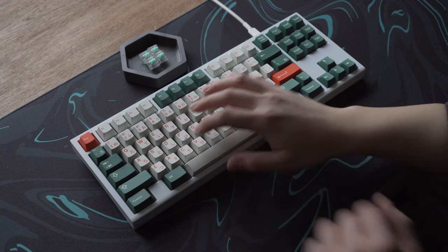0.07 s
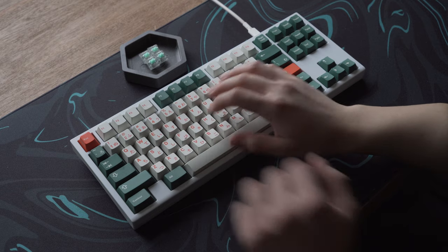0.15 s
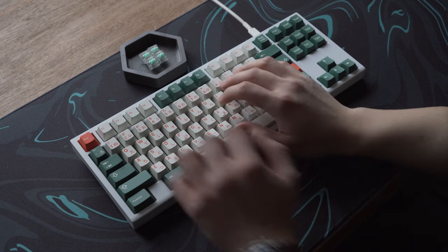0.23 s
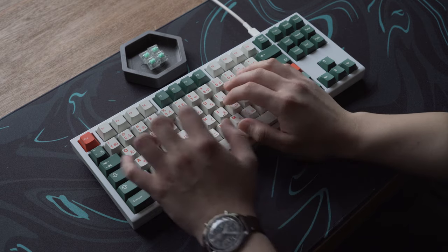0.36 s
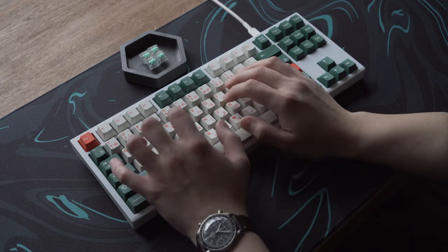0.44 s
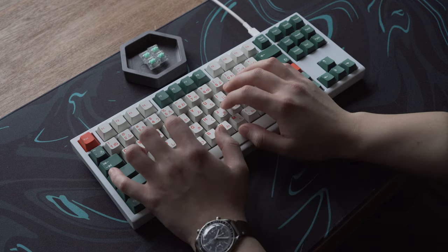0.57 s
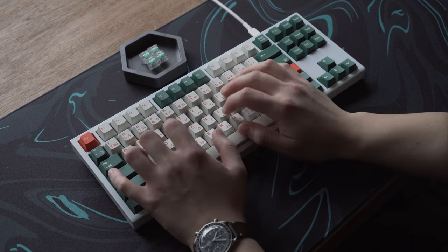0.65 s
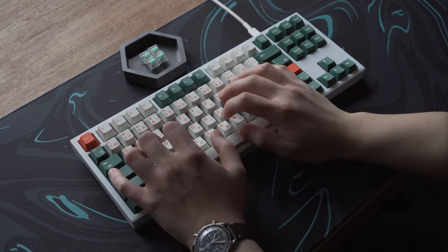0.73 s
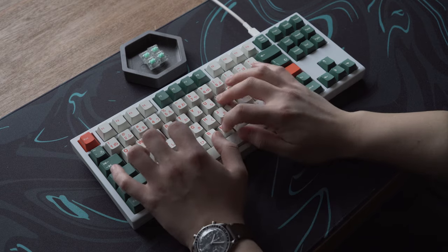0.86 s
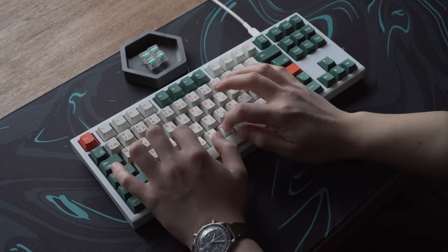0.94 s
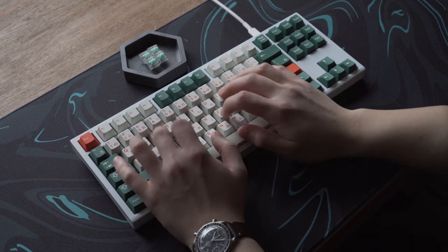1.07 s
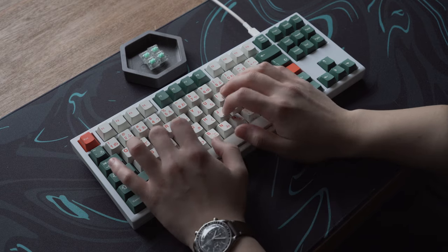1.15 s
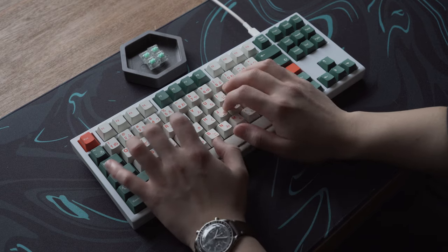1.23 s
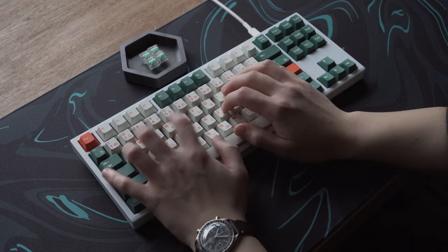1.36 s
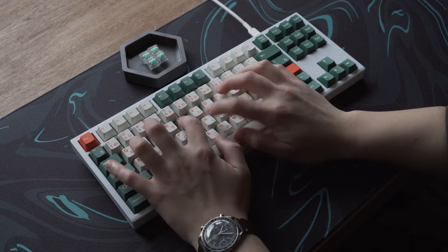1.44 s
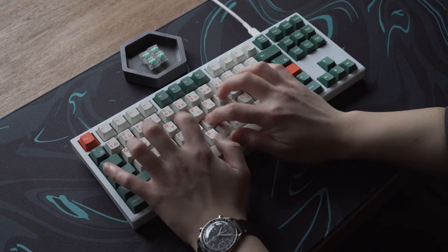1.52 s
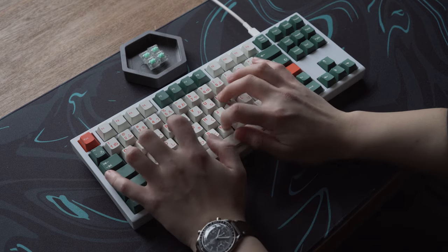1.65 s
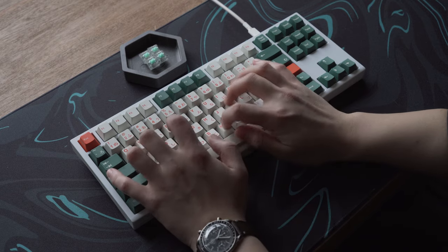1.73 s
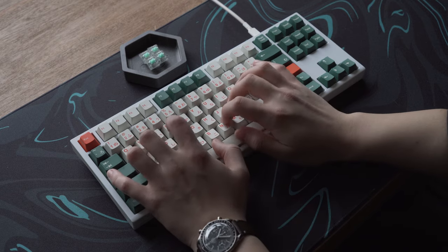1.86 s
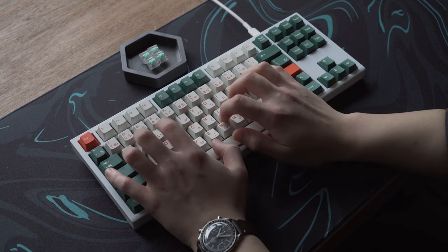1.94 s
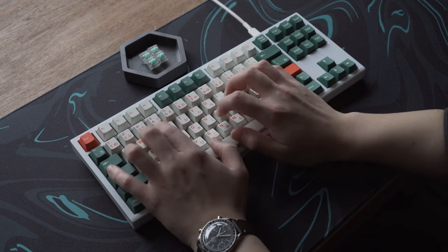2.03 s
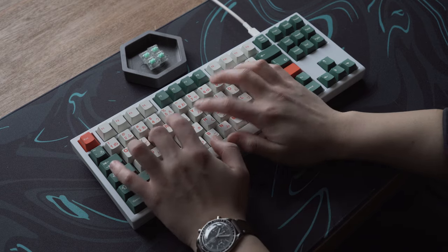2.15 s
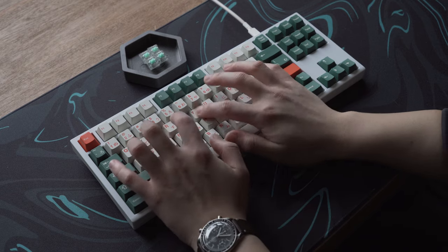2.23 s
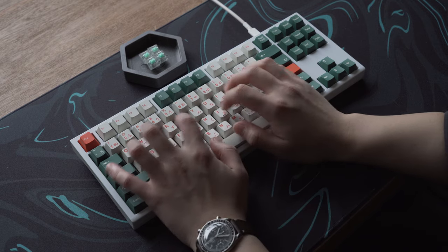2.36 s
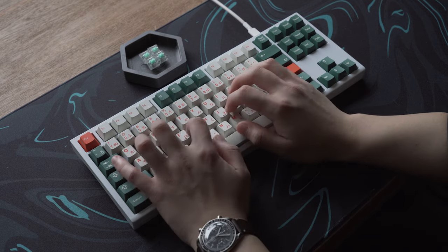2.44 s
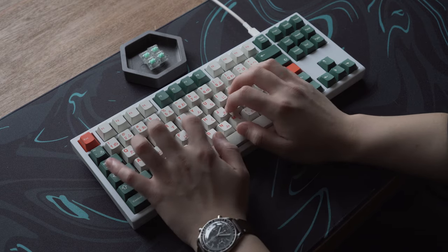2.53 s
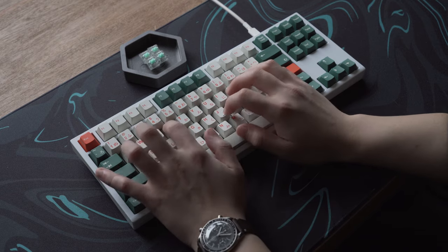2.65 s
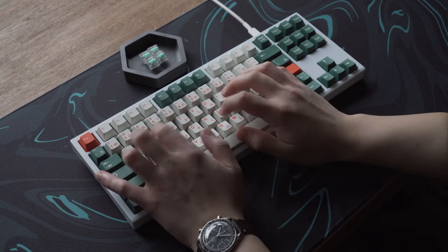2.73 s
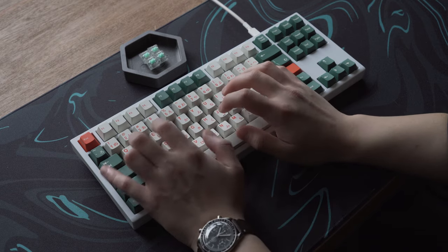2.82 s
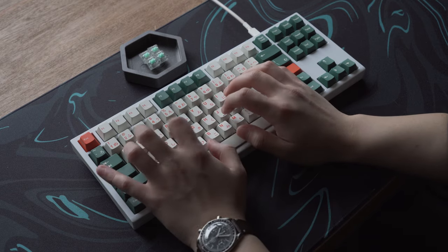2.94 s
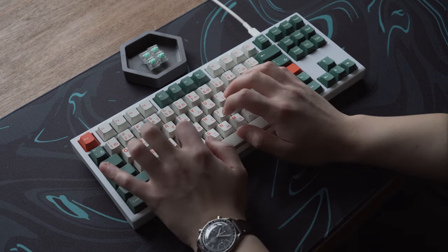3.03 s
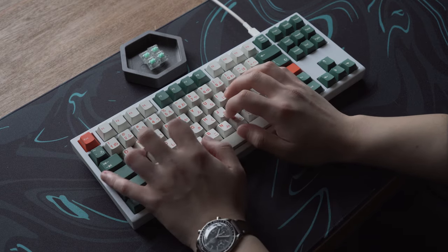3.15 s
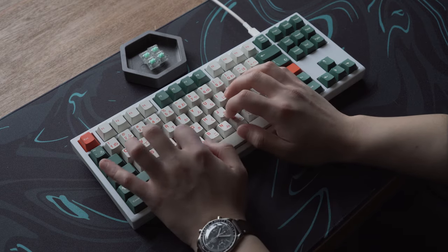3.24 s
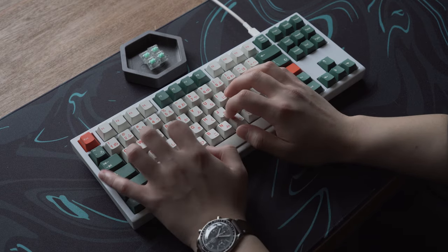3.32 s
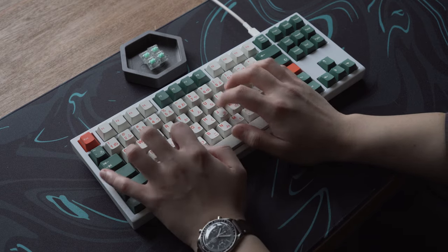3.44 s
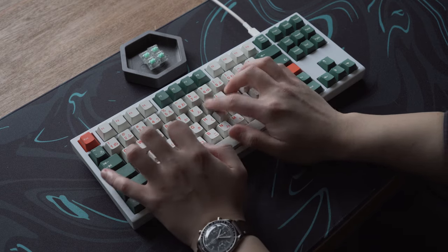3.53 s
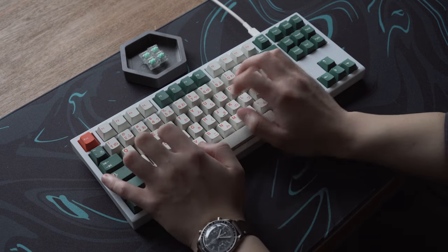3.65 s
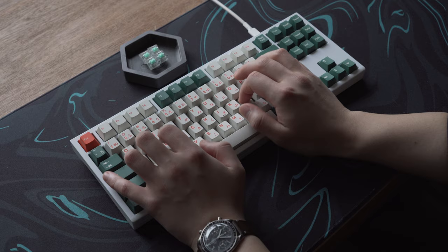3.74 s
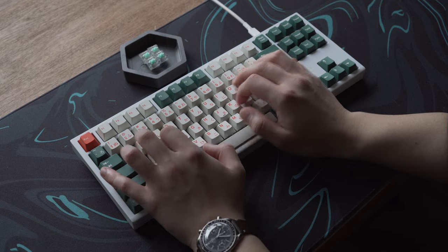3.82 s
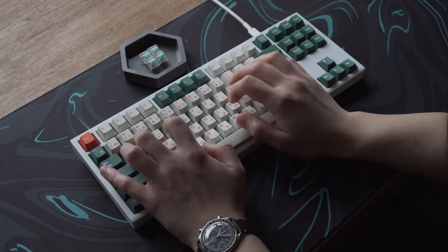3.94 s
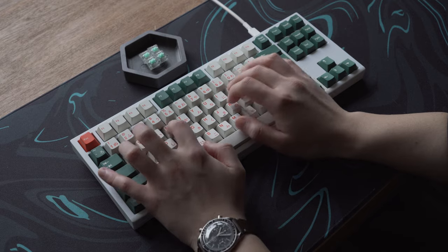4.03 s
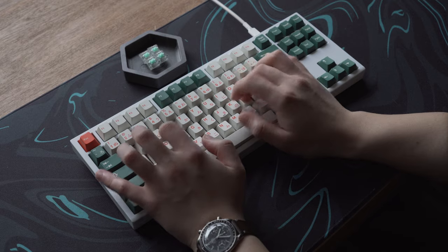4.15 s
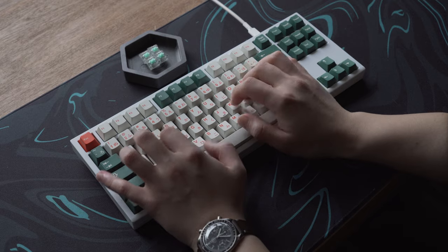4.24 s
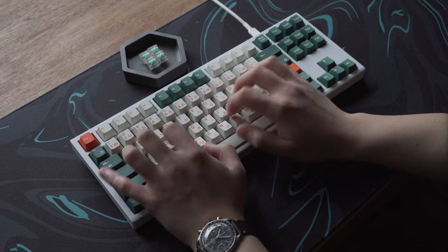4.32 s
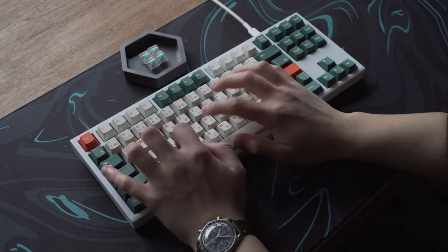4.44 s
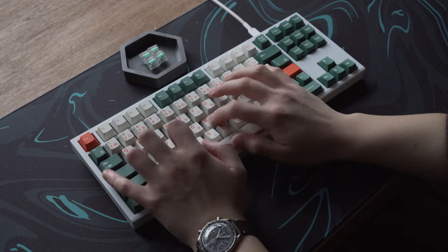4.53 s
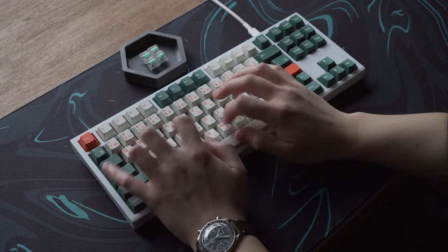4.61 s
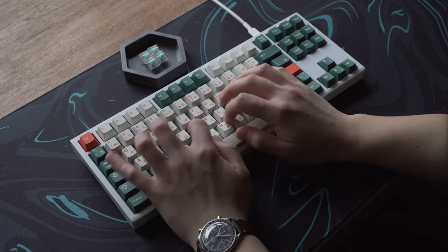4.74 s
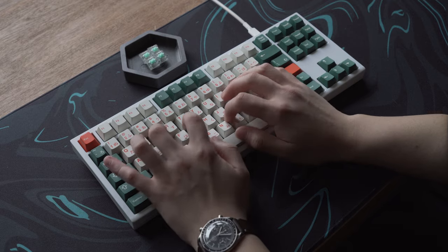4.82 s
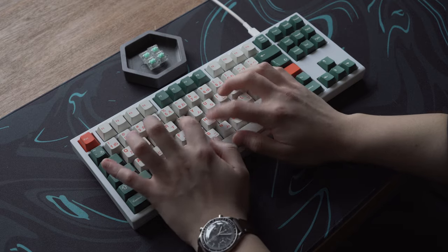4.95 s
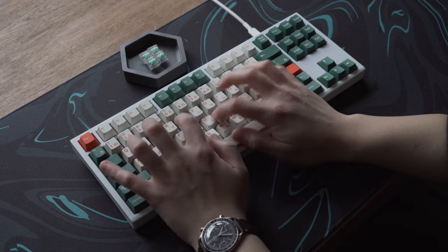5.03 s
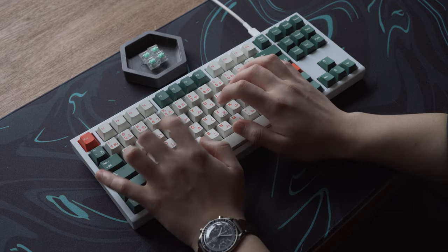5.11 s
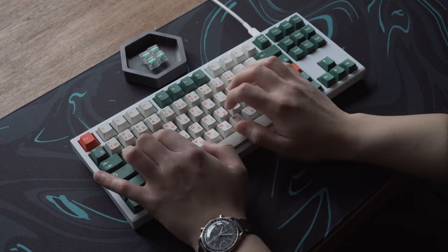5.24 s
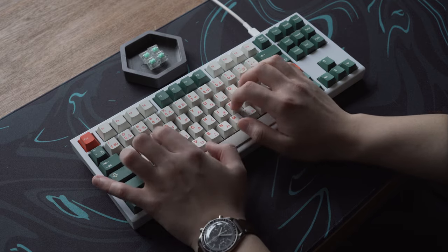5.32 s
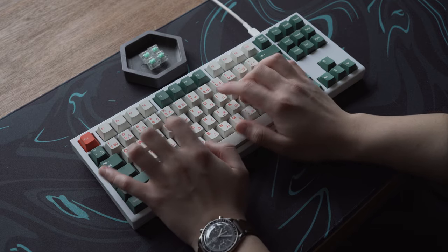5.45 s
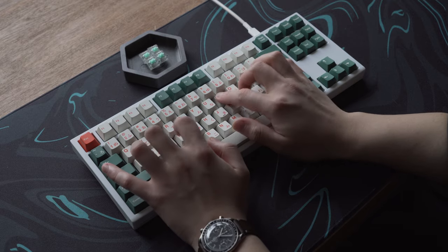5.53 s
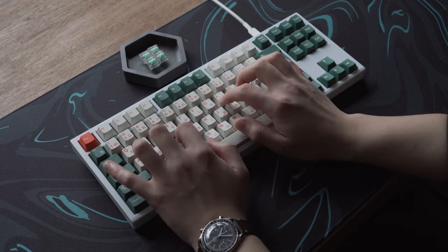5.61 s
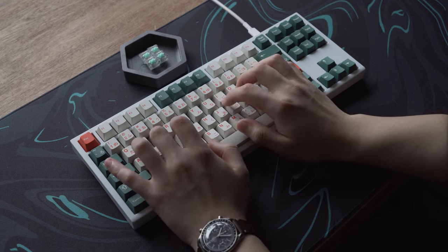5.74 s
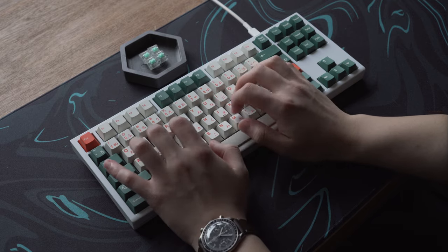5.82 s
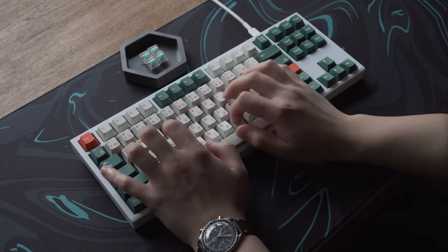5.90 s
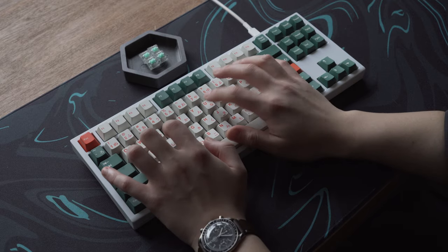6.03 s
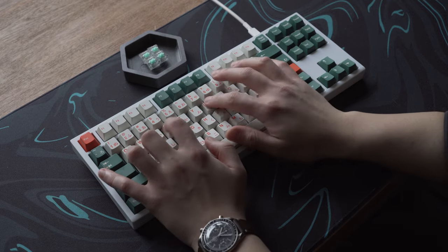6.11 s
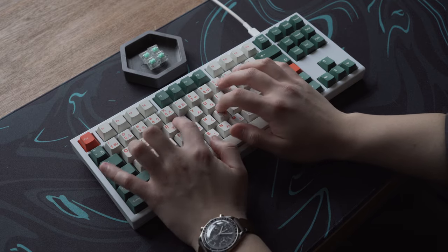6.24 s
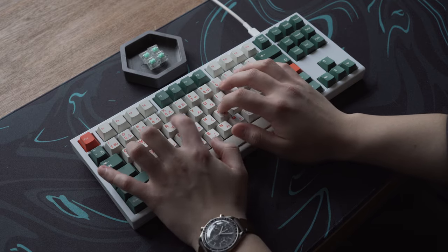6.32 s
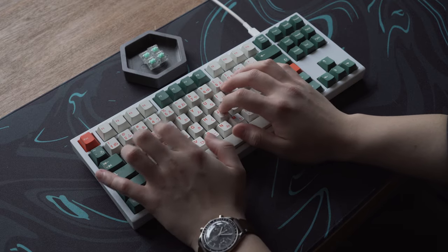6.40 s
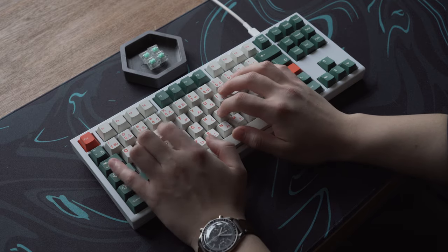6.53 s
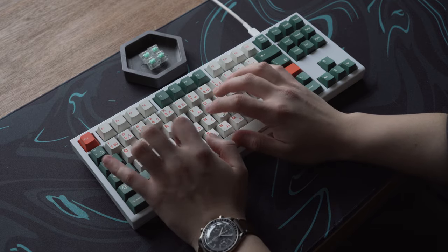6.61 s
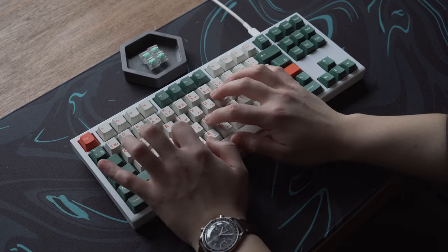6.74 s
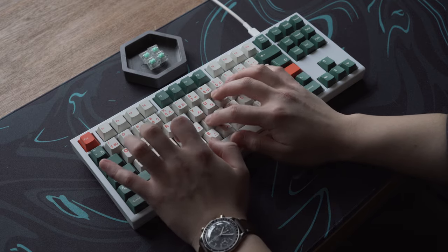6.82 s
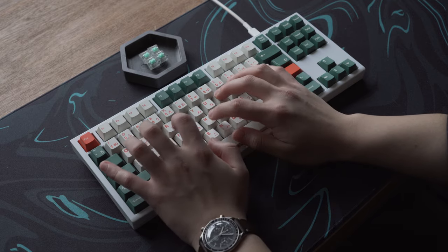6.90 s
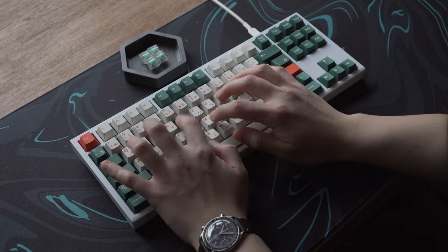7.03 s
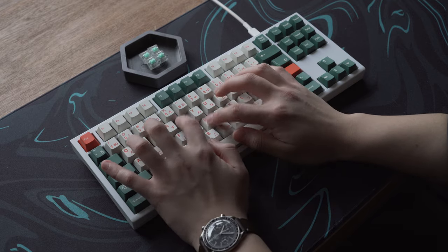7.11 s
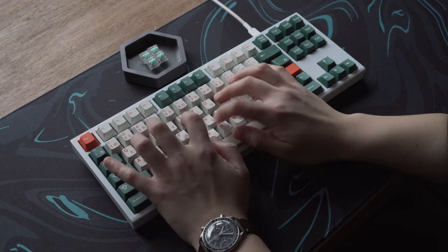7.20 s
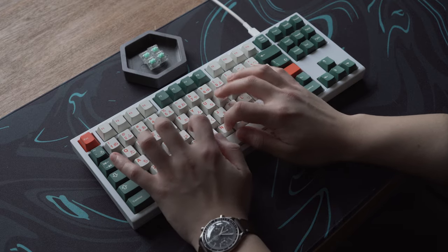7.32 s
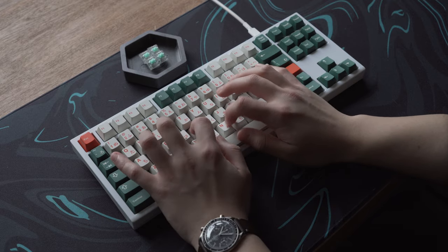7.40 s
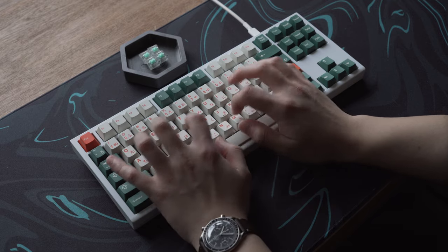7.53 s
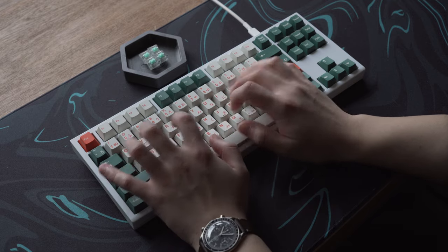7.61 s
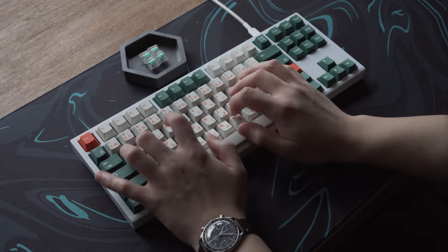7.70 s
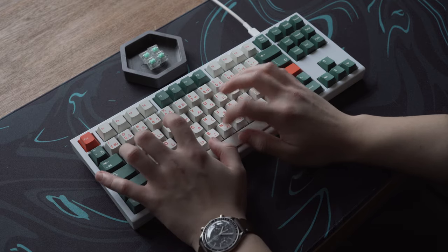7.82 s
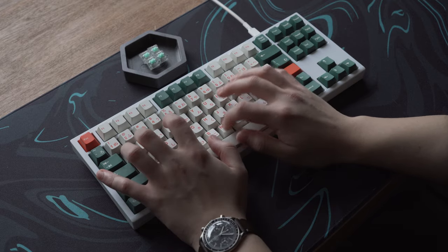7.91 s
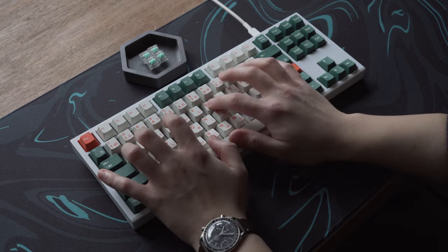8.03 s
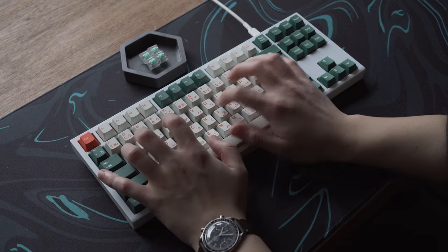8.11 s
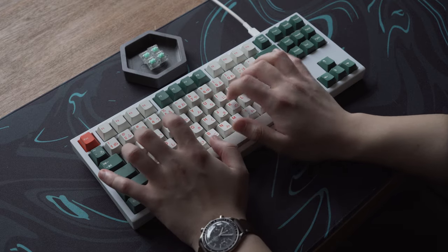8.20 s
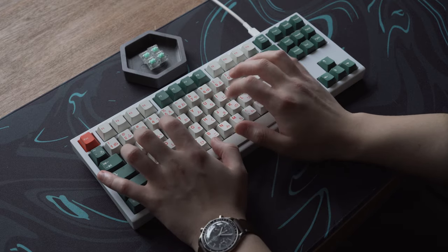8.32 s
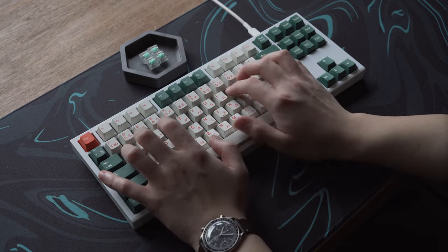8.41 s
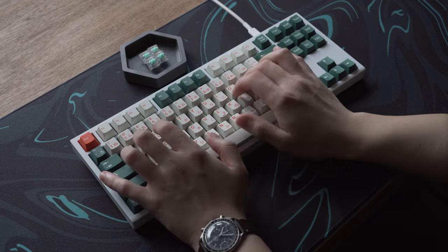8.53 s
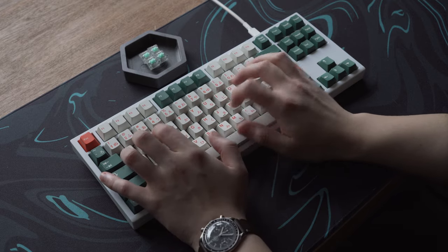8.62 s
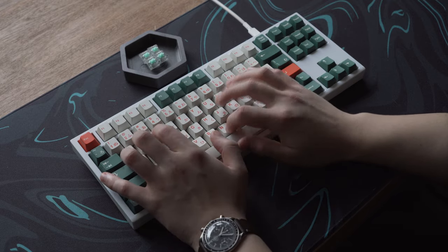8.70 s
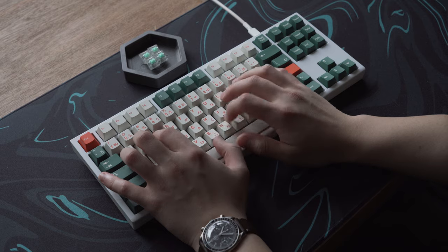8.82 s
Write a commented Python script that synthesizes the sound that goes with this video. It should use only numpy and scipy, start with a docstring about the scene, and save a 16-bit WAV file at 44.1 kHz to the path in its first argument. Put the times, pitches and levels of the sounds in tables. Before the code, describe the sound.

Fingers rattle quickly over a clacky keyboard on a padded desk, with soft low desk thumps and a short room tail.

```python
"""In a quiet small room, fingers type fast on a plastic keyboard lying on a desk mat, close to one microphone.
Each contact is a sum of damped modes: cap, switch snap, plate and case, with extra modes for the space bar.
The desk top swings low after every push, and bursts of coloured noise are the light touches of fingertips.
A diffuse decaying tail answers each contact; hand sway, skin hiss and a steady quiet floor lie beneath."""
import sys
import numpy as np
from scipy import signal
from scipy.fft import rfft, irfft, next_fast_len
from scipy.io import wavfile

SR = 44100
rng = np.random.default_rng(int(sys.argv[2]) if len(sys.argv) > 2 else 0)


def volts_from_db(level):
    """Convert decibel levels to linear amplitude ratios."""
    exponent = np.asarray(level, float) / 20
    return 10 ** exponent


def unload_audio(sound):
    """Save the sound as a 16-bit wav file, at the path given as the first command line argument."""
    columns = np.transpose(np.atleast_2d(sound))
    # keep every value between -1 and 1, then stretch to whole-number steps
    steps = np.round(np.clip(columns, -1, 1) * 32767)
    wavfile.write(sys.argv[1], SR, steps.astype(np.int16))


N = 390726  # samples
WIDE_HZ = 2000  # contacts with a cap pitch below this are the long space bar


def unit(x):
    """RMS normalisation: scale a signal to unit mean power."""
    return x / np.sqrt(np.mean(x ** 2) + 1e-20)


def along(points, hz):
    """Logarithmic frequency axis: interpolate (frequency_hz, value) points at hz."""
    point_hz, value = np.transpose(points)
    return np.interp(np.log(hz + 1), np.log(point_hz + 1), value)


def noise(spectrum):
    """Spectral shaping: white noise weighted to the given colour, at rms 1."""
    size = next_fast_len(N)
    gain = volts_from_db(along(spectrum, np.fft.rfftfreq(size, 1 / SR)))
    white = rng.standard_normal(size)
    return unit(irfft(rfft(white) * gain, size)[:N])


def place(times, rows):
    """Linear superposition: add each row to the time line at its moment."""
    first = np.round(times * SR).astype(int)[:, None]
    where = first + np.arange(rows.shape[1])
    return np.bincount(where.clip(0).ravel(), rows.ravel(), N + SR)[:N]


def ring(t, hz, db, t60, attack):
    """Damped free vibration: one decaying sine with a soft onset for each row of hz and db."""
    decay = volts_from_db(db[:, None] - 60 * t / t60)
    onset = 1 - np.exp(-t / attack)
    return decay * onset * np.sin(2 * np.pi * hz[:, None] * t)


def body(t, modes, db, attack, spread_db, detune):
    """Modal superposition: modes of random strength, sign and slight detuning for every contact."""
    chance = rng.standard_normal((len(db), len(modes), 3))
    total = 0
    for k, (hz, level_db, t60) in enumerate(modes):
        pitch = hz * (1 + detune * chance[:, k, 0])
        strength_db = db + level_db + spread_db * chance[:, k, 1]
        total = total + np.sign(chance[:, k, 2:]) * ring(t, pitch, strength_db, t60, attack)
    return total


# colour of room air and microphone hiss: frequency_hz, relative density_db (per Hz)
HUSH_COLOUR = [(71, -19), (120, -8.5), (493, -7), (670, -19.5), (1010, -16.5), (1400, -16.5), (3450, -23),
               (4590, -26), (15000, -32.5), (16000, -47)]


def hush():
    """Stationary noise floor: room air and microphone hiss at a constant rms."""
    return volts_from_db(-77.5) * noise(HUSH_COLOUR)


# restless hands: time_s, sway_db (desk sway rms), hiss_db (skin hiss rms)
HAND_LEVELS = [(0, -61, -88), (.5, -74.5, -97), (1.06, -58.5, -86), (1.45, -60.5, -82), (2.2, -61.5, -82),
               (3.2, -60, -82), (3.85, -61.5, -82), (4.3, -57, -82), (4.65, -55, -79), (5.4, -63, -93),
               (6.5, -58, -91), (6.85, -65.5, -89), (7.8, -55.5, -77), (8.3, -61, -85), (8.5, -55, -68),
               (8.86, -63, -78)]


def hands():
    """Amplitude modulation: sway and hiss gains, interpolated sample by sample in dB."""
    when, *levels_db = np.transpose(HAND_LEVELS)
    t = np.arange(N) / SR
    return [volts_from_db(np.interp(t, when, level_db)) for level_db in levels_db]


# colour of skin on plastic: frequency_hz, relative density_db (per Hz)
SKIN_COLOUR = [(1500, -24), (3500, 1.5), (6000, -13), (9000, -11.5), (12000, -23), (14500, -31),
               (16000, -50)]


def rub():
    """Sliding friction: a faint dry hiss of skin on plastic, as coloured noise of varying level."""
    return hands()[1] * noise(SKIN_COLOUR)


# desk top modes: ratio (multiple of the pitch), level_db (relative), t60_s
DESK_MODES = [(1, 8, 0.056), (1.7, -14.5, 0.14), (.6, -6, 0.094)]
# colour of the desk under resting hands: frequency_hz, relative density_db (per Hz)
SWAY_COLOUR = [(15, -5.5), (30, 4.5), (75, -1.5), (130, -7.5), (200, -25), (400, -58)]
DESK_KEY_HZ, DESK_BAR_HZ, DESK_DETUNE = 64, 75.8, 0.07  # the bar sits nearer the desk's edge
DESK_LAG_S, REBOUND_S, REBOUND_DB = 0.00792, 0.0505, -10  # delays counted from the contact


def swing(pitch_hz, push_db):
    """Low-frequency plate resonance: the damped desk modes with a slow onset."""
    t = np.arange(SR // 3) / SR
    return sum(ring(t, ratio * pitch_hz, push_db + 16.5 + level_db, t60, 0.035)
               for ratio, level_db, t60 in DESK_MODES)


def desk():
    """Impulsive excitation of a resonator: each push swings the top late, rebounds once, over hand sway."""
    s, _, cap_hz, _, push_db = np.transpose(CONTACT_EVENTS)
    detune = 1 + DESK_DETUNE * rng.standard_normal((len(s), 2))
    hz = np.where(cap_hz < WIDE_HZ, DESK_BAR_HZ, DESK_KEY_HZ)[:, None] * detune
    pushes = place(s + DESK_LAG_S, swing(hz[:, 0], push_db))
    rebounds = place(s + REBOUND_S, swing(hz[:, 1], push_db + REBOUND_DB))
    return pushes + rebounds + hands()[0] * noise(SWAY_COLOUR)


LEAD_S, LEAD_SPREAD_S = 0.009, 0.0034  # the finger meets the cap before the stem lands
LEAD_DB, LEAD_GROWS = -58, 0.18  # relative level for a -23 dB contact; dB gained per dB of contact
BRUSH_DB, BRUSH_S, BRUSH_TREBLE_DB = -59, 0.0023, 0  # strays: relative level; all faint ones: length, treble


def faint_touches(count):
    """Random point process: a touch about 9 ms ahead of every contact, and strays while the typing lasts."""
    s, db, *_ = np.transpose(CONTACT_EVENTS)
    lead = rng.standard_normal((len(s), 2))
    lead_s = s - LEAD_S - LEAD_SPREAD_S * lead[:, 0]
    lead_db = LEAD_DB + LEAD_GROWS * (db + 23) + 3 * lead[:, 1]
    stray_s = s[1] + rng.random(count) * (s[-1] - s[1])
    stray_db = BRUSH_DB + 3 * rng.standard_normal(count)
    when = np.append(lead_s, stray_s)
    treble_db = BRUSH_TREBLE_DB + 4 * rng.standard_normal(len(when))
    return np.transpose([when, np.append(lead_db, stray_db), treble_db, np.full(len(when), BRUSH_S)])


# light touches, a fingertip brushing a cap or a loose stem rattling:
# start_s, level_db (relative, of the body), treble_db (relative to the body), length_s
TOUCH_EVENTS = [(.0737,-51,-19,0.0045),(.3188,-58,-7,0.0026),(.3315,-52.5,-6,0.0042),(.396,-50.5,-21,0.0038),(.5624,-50,-6,0.0091),(.883,-44,5,0.0021),
                (.969,-51,-6,0.0032),(1.199,-49,-10,0.0036),(1.351,-49.5,-27,0.0086),(1.3802,-52,-7,0.0029),(1.467,-44,-8,.004),(1.739,-37,-40,.002),(1.899,-49,-1,0.0054),
                (2.062,-52,-4,.004),(2.2228,-43,0,0.0073),(2.325,-53,5,.0098),(2.334,-50,-25,0.0066),(2.4726,-48,-5,0.0041),(2.6513,-52,1,.004),(2.6566,-37,-17,0.0045),(2.81,-42,-7,0.016),
                (2.85,-49,-14,.0072),(3.0185,-60,-21,.0035),(3.059,-45,0,0.008),(3.0744,-42,2,.0061),(3.1667,-50,-5,.004),(3.229,-31,-0.5,0.0063),(3.323,-38.5,0.5,0.011),
                (3.468,-51.5,-4,0.0063),(3.491,-37.5,-25,.0029),(3.5143,-51,-4,0.0099),(3.575,-44,-9,0.0034),(3.7573,-46,-7,.0091),(3.816,-57,8,.0046),(3.845,-44,0,.004),
                (4.0149,-34,-13,0.0047),(4.189,-45,-14,0.0032),(4.2427,-48,-1,0.003),(4.3047,-44.5,3,0.0052),(4.3144,-46,-20,0.0041),(4.4436,-34,1,.0044),
                (4.733,-46,0,.0026),(4.797,-44,-24,0.0015),(4.812,-45,-2,0.0029),(4.899,-58,-10,0.0053),(4.909,-49,-2,0.0031),(5.1822,-42,-8,.004),(5.259,-45,-5,0.0054),(5.3241,-44,-7,0.003),
                (5.469,-35,-33,0.0042),(5.479,-39,-14,0.0035),(5.532,-41,-7,0.0034),(5.619,-48,2,.0036),(5.795,-49,2,.0043),(5.9318,-38,-14,0.0059),(6.015,-41.5,-4,0.013),
                (6.1044,-38,-11,0.0065),(6.2642,-52,-1,0.0045),(6.3025,-48,-6,.002),(6.7,-50,-3,.004),(6.982,-50,-4,.0065),(7.021,-47,-13,.0028),(7.0845,-46,-5,0.0052),
                (7.431,-52,3,0.0047),(7.4792,-38,-29,0.0032),(7.5255,-49,-38,.0032),(7.6692,-34,-3,0.0038),(7.747,-45,4,.004),(7.798,-45,-24,.0024),(7.8097,-50,-9,.004),
                (7.8916,-44,-4,.0047),(8.0777,-52,-17,.006),(8.228,-53,2,0.012),(8.2827,-53,5,0.005),(8.4313,-44,-10,0.0031),(8.553,-42,-1,0.0062),(8.7296,-40,-10,0.0066),(8.843,-52,0,0.0044)]
# colour of a touch's body: frequency_hz, relative density_db (per Hz)
SLIDE_COLOUR = [(400, -7), (1200, 5.5), (3000, 7), (4500, 0), (6000, -71)]
# colour of a touch's treble: frequency_hz, relative density_db (per Hz)
FIZZ_COLOUR = [(3500, -20.5), (5500, 9.5), (8000, 6.5), (11000, -2.5), (14000, 1), (16500, -29)]


def touches():
    """Micro-contact noise: coloured noise in two bands, starting sharply under a Gaussian decay."""
    s, db, treble_db, length = np.vstack([TOUCH_EVENTS, faint_touches(count=25)]).T
    t = np.arange(1024) / SR
    burst = np.exp(-(t / length.clip(0.001)[:, None]) ** 2)
    low = place(s, volts_from_db(db - 8.5)[:, None] * burst) * noise(SLIDE_COLOUR)
    high = place(s, volts_from_db(db + treble_db - 12.5)[:, None] * burst) * noise(FIZZ_COLOUR)
    return low + high


# reverberation time of the room: frequency_hz, t60_s
ROOM_T60 = [(200, 0.99), (1000, 0.29), (1600, 0.31), (3000, 0.3), (6000, 0.31), (12000, 0.29)]
# colour of the walls' answer: frequency_hz, level_db (relative)
WALL_COLOUR = [(200, -1), (1000, 5), (1350, 2.5), (1620, 4), (1900, -0.5), (3200, -1.5), (7000, -1.5),
               (13000, -3), (16000, -3)]


def room(s, sounds):
    """Convolution with a diffuse field: a fresh decaying noise tail for every contact."""
    size = 16384  # long enough for a 2048-sample contact and its tail
    white = rng.standard_normal((len(s), size - 2048))
    hz, t, z = signal.stft(white, SR, nperseg=256)
    z = z * volts_from_db(along(WALL_COLOUR, hz)[:, None] - 60 * t / along(ROOM_T60, hz)[:, None])
    tail = signal.istft(z, SR, nperseg=256)[1][:, :size - 2048]
    age = np.arange(tail.shape[1]) / SR
    # scatter at once, a very slight step up at 9 ms and a swell around 12 ms
    step = 0.06 / (1 + np.exp((0.009 - age) / 0.00041))
    swell = 4.9 * np.exp(-((age - 0.012) / 0.007) ** 2)
    tail *= 4.0 + step + swell
    tail /= np.sqrt(np.mean(np.sum(tail ** 2, axis=1)))  # unit mean energy
    return place(s, irfft(rfft(sounds, size) * rfft(tail, size), size))


# modes only the space bar has: pitch_hz, level_db (relative), t60_s
BAR_MODES = [(3100, -8.5, 0.0062), (3760, -20.5, 0.0097), (4250, -24, 0.012), (4930, -34, 0.024)]


def cap_ring(t, db, hz, wide):
    """Free vibration of a struck shell: three cap modes, and more for the long bar."""
    cap = ring(t, hz, db + 13, 0.0034, 0.00085)
    # a weaker mode below widens the clack
    cap += ring(t, 0.825 * hz, db + 1.0, 0.0046, 0.0015)
    # one above sounds more on some contacts than on others
    upper = rng.standard_normal((len(db), 2))
    cap += ring(t, (1.166 + 0.012 * upper[:, 0]) * hz, db - 12.5 + 4 * upper[:, 1], 0.0081, 0.00057)
    return cap + wide[:, None] * body(t, BAR_MODES, db + 4, 0.0003, 2, 0.02)


# switch housing modes: pitch_hz, level_db (relative), t60_s
SNAP_MODES = [(4670, -4.5, 0.0051), (5470, -2, .003), (6400, -4, 0.0042), (7264, -1.5, 0.004),
              (8150, -7.5, 0.0043), (9170, -2, 0.0024), (10395, -5, 0.0038), (11570, -13.5, 0.0039),
              (13070, -10, 0.0023), (14800, -23.5, .003)]
BRIGHT_DB, BRIGHT_GROWS = -8, 0.82  # added treble at a -20.5 dB contact; dB gained per dB of contact


def switch_snap(t, db, snap_db, wide):
    """Impact spectrum: the stem strikes the housing, and harder blows are brighter."""
    snap = body(t, SNAP_MODES, db + snap_db + 1.5, 0.0003, 3, 0.03)
    # the heavy bar lands with a duller snap
    dull = signal.lfilter(*signal.butter(2, 8000, fs=SR), snap)
    snap = np.where(wide[:, None], dull, snap)
    treble = signal.lfilter(*signal.butter(2, 9500, 'high', fs=SR), snap)
    return snap + volts_from_db(BRIGHT_DB + BRIGHT_GROWS * (db + 20.5))[:, None] * treble


# plate modes: pitch_hz, level_db (relative), t60_s
PLATE_MODES = [(516, -23, 0.01), (776, -17.5, .012), (942, -7, 0.016), (1153, -0.5, 0.013),
               (1448, -14.5, 0.06), (1719, 4, 0.014), (2063, 4.5, 0.0098)]
# base level at a -20.5 dB contact; dB gained per dB of contact, and per dB of snap
PLATE_DB, PLATE_GROWS, PLATE_WITH_SNAP = -39, 0.53, 0.29


def plate_knock(t, db, snap_db):
    """Forced plate modes: the plate answers the blow and follows the strength of its snap."""
    plate_db = PLATE_DB + PLATE_GROWS * (db + 20.5) + PLATE_WITH_SNAP * (snap_db - snap_db.mean())
    return body(t, PLATE_MODES, plate_db, 0.0004, 2, 0.015)


# case modes: pitch_hz, level_db (relative), t60_s
CASE_MODES = [(335, -5, 0.017), (430, -14.5, 0.032), (630, -33.5, 0.004)]
# base levels at a -20.5 dB contact; dB gained per dB of contact
CASE_KEY_DB, CASE_BAR_DB, CASE_KEY_GROWS, CASE_BAR_GROWS = -57, -34.5, 0.17, 0.57


def case_knock(t, db, wide):
    """Structure-borne coupling: the case knocks low, and more strongly under the bar."""
    blow = db + 20.5
    key_db = CASE_KEY_DB + CASE_KEY_GROWS * blow
    bar_db = CASE_BAR_DB + CASE_BAR_GROWS * blow
    return body(t, CASE_MODES, np.where(wide, bar_db, key_db), 0.0008, 1.5, 0.03)


# stem contacts, also read by the desk and the faint touches:
# start_s, level_db (relative), pitch_hz (of the cap), snap_db (relative to the level), push_db (relative, on the desk)
CONTACT_EVENTS = [(.081,-21,3100,-9.5,-58.5),(.5852,-15.5,1890,-15.5,-44),(0.7068,-41.5,1640,-23,-54),(0.8468,-15.5,2980,-17,-46.5),(.9013,-13,3100,-20.5,-45),
                  (.942,-25,2840,-15.5,-62),(.9895,-16,3160,-22,-52),(1.0219,-20.5,2850,-17.5,-74),(1.0931,-24.5,2900,-10,-70),(1.132,-13,2910,-15.5,-49),
                  (1.224,-19.5,1740,-11.5,-44),(1.281,-21.5,2900,-13,-66),(1.481,-12,2990,-15.5,-46),(1.5356,-16.5,2840,-8,-44),(1.5641,-23.5,3050,-16,-63),
                  (1.6133,-19.5,2820,-15.5,-52),(1.6966,-43,3300,-7,-60),(1.7053,-13,2820,-12.5,-39.5),(1.797,-11,2720,-12,-50.5),(1.8042,-17.5,2940,-18,-71),
                  (1.821,-28,2980,-40,-66),(1.9321,-25.5,1690,-17.5,-45.5),(2.0486,-39,3100,-9,-62),(2.1545,-14,2990,-15,-53),(2.232,-10,2700,-11.5,-41),
                  (2.245,-25,2960,-18,-60),(2.3324,-27,2920,-8.5,-55),(2.3467,-17,1700,-12.5,-43),(2.368,-36.5,3430,-9,-55),(2.4319,-31.5,1580,-11,-50),
                  (2.4974,-20,3060,-21.5,-52),(2.5774,-12,3020,-14.5,-68),(2.6655,-15.5,2710,-8.5,-48),(2.7322,-22,2820,-16,-77),(2.8243,-19,2850,-24.5,-52),
                  (2.8832,-28,3480,-8,-62),(2.9412,-42.5,3600,-6,-54),(2.9636,-27.5,1650,-13,-45),(3.0332,-30.5,1740,-20,-49),(3.0672,-25.5,3980,-2,-56),
                  (3.1352,-27.5,3070,-8,-66),(3.1399,-27,2280,-12.5,-63),(3.2381,-10,2790,-15.5,-45),(3.2635,-21,3000,-17.5,-41),(3.3429,-28,3040,-12,-55),
                  (3.358,-25,1680,-15,-47),(3.4948,-36,3000,-26,-51.5),(3.5396,-10.5,3060,-17,-46),(3.5513,-28,2940,-23,-67),(3.5875,-15.5,2760,-11,-48.5),
                  (3.6345,-27,3100,-14,-58),(3.6654,-15,2760,-16,-60),(3.7648,-11,2700,-12.5,-39.5),(3.8343,-18.5,2760,-11.5,-45),(3.8649,-19.5,1800,-18,-47),
                  (3.9123,-45,1640,2,-50),(3.9388,-18,3040,-15,-68),(3.988,-37,2030,-32,-60),(4.0053,-26,3020,-8,-67),(4.025,-9.5,2940,-15.5,-46),
                  (4.0716,-20,2920,-13,-67),(4.0976,-19,3000,-9,-65),(4.1498,-25,2880,-12.5,-65),(4.2,-15,2700,-13.5,-43),(4.258,-17,3050,-15.5,-47),
                  (4.3303,-23,1740,-20,-50),(4.3705,-31,3030,-14,-61),(4.4195,-31,1740,-19,-50),(4.4561,-18,2930,-18.5,-55),(4.529,-25,3020,-17,-72),
                  (4.5414,-12.5,2680,-9,-42),(4.603,-9.5,3020,-26,-62),(4.6098,-29,2230,-10,-50),(4.678,-18,2750,-19,-50),(4.6933,-16,2780,-15,-41),
                  (4.7519,-14.5,3040,-19.5,-51),(4.8329,-15.5,3100,-14,-53),(4.838,-11.5,3030,-28.5,-51),(4.9234,-18,1800,-9,-43),(4.968,-29,2920,-25,-67),
                  (5.0117,-32,1720,-10,-49),(5.023,-19.5,2870,-7.5,-53),(5.0535,-27.5,3000,-22,-64),(5.0966,-14,2830,-12,-57),(5.1655,-14.5,2960,-16.5,-47),
                  (5.2,-22.5,3150,-17.5,-49),(5.27,-12.5,2870,-15,-47),(5.3398,-30.5,1620,-22,-51),(5.3957,-34.5,2870,-22,-66),(5.493,-15.5,2670,-12,-44),
                  (5.5418,-9,2920,-16,-43.5),(5.5862,-22.5,2740,-24,-52),(5.6325,-19.5,2830,-12,-45.5),(5.7288,-26,3100,-12.5,-60),(5.7623,-22,2970,-14.5,-49),
                  (5.8295,-29,1590,-17.5,-47),(5.8807,-23,2910,-13.5,-60),(5.9365,-32.5,2980,-21,-70),(5.9485,-13.5,2930,-16.5,-43),(6.0042,-37,2930,-7,-51),
                  (6.0201,-20.5,2880,-17,-62),(6.1133,-13.5,2800,-11,-44),(6.1682,-15.5,3100,-18.5,-51),(6.2789,-23,3100,-14.5,-54),(6.3305,-23,1700,-13.5,-47),
                  (6.369,-34,1910,-12,-67),(6.3792,-24.5,2930,-18.5,-73),(6.4343,-24,3060,-12,-47.5),(6.4866,-14,2880,-19.5,-52),(6.5646,-18,3200,-15.5,-52.5),
                  (6.584,-28,2960,-5.5,-56),(6.6384,-22.5,2750,-20,-75),(6.7186,-24.5,2970,-24,-51),(6.729,-41.5,3220,-7,-52),(6.757,-39.5,2600,-11,-58),
                  (6.817,-19.5,3000,-14.5,-60),(6.8438,-32,2960,-11,-57),(6.918,-30.5,2900,-11,-72),(7.0109,-23.5,1750,-13.5,-47.5),(7.0951,-10,2890,-15.5,-46),
                  (7.1849,-16.5,3000,-11.5,-48),(7.25,-10,3330,-18.5,-47),(7.257,-22.5,2790,-16,-73),(7.3362,-35,2940,-17,-53),(7.3465,-12,2860,-13.5,-41),
                  (7.435,-15,2980,-19.5,-48),(7.4665,-38,2000,-23,-50),(7.5636,-13.5,2920,-16,-47),(7.6433,-27.5,1730,-18,-74),(7.6753,-6.5,2630,-11.5,-36.5),
                  (7.7597,-19,2910,-16.5,-47),(7.8373,-22,1740,-16,-48),(7.8869,-29,2990,-8,-52),(7.9047,-9,2950,-18.5,-40.5),(7.92,-27.5,1920,-9,-70),
                  (7.9908,-20.5,2820,-15.5,-64),(8.0859,-9,2730,-9.5,-42),(8.1645,-18.5,2860,-18.5,-64),(8.2358,-12,2680,-16,-41.5),(8.3037,-16,1860,-17.5,-42.5),
                  (8.3162,-17.5,2760,-20,-67),(8.4212,-32.5,3150,-22,-72),(8.4407,-9.5,2810,-12,-40),(8.4507,-28,2070,-26,-53),(8.5216,-21.5,3020,-20.5,-58),
                  (8.5634,-14,2830,-15,-41.5),(8.6514,-18,2770,-16,-63),(8.741,-12,2910,-16,-40.5),(8.831,-20,2960,-24,-56),(8.8544,-27,2840,-18,-62)]
BAR_ROOM_DB = -1  # the bar sends less to the room


def contacts():
    """Modal sum of an impact: cap, snap, plate and case of each contact, and its gain into the room."""
    s, db, hz, snap_db, _ = np.transpose(CONTACT_EVENTS)
    t = np.arange(2048) / SR
    wide = hz < WIDE_HZ
    sounds = cap_ring(t, db, hz, wide) + switch_snap(t, db, snap_db, wide)
    sounds += plate_knock(t, db, snap_db) + case_knock(t, db, wide)
    return s, sounds, volts_from_db(BAR_ROOM_DB * wide)[:, None]


def scene():
    """Superposition at the microphone: quiet floor, hands, desk, touches, and keys with their room answer."""
    s, sounds, room_gain = contacts()
    background = hush() + rub() + desk() + touches()
    keys = place(s, sounds) + volts_from_db(-17.0) * room(s, room_gain * sounds)
    return (background + keys)[None]


def band_limit(x):
    """A steep low-pass at the top of the band."""
    return signal.sosfilt(signal.butter(12, 16800, fs=SR, output="sos"), x)


def record(dry):
    """Single-channel pickup: the finished mix of the one microphone."""
    return band_limit(dry)


dry = scene()
out = record(dry)
unload_audio(out)
```